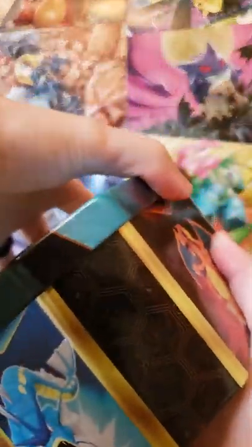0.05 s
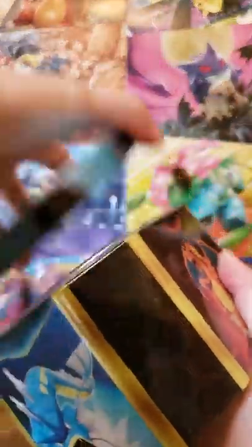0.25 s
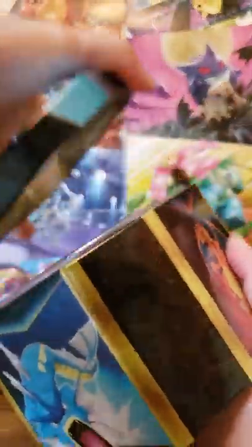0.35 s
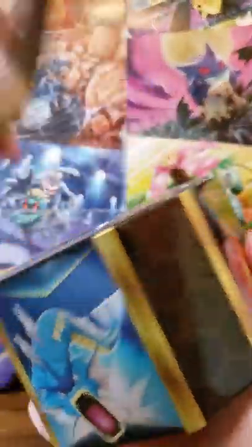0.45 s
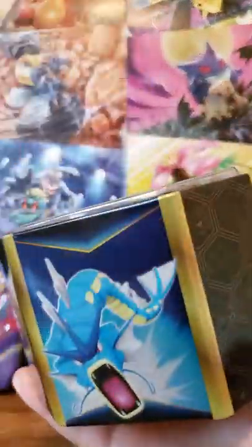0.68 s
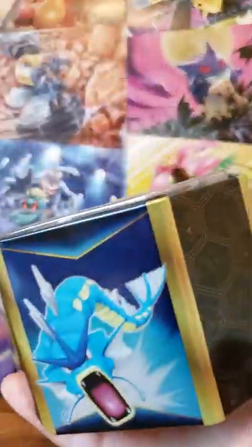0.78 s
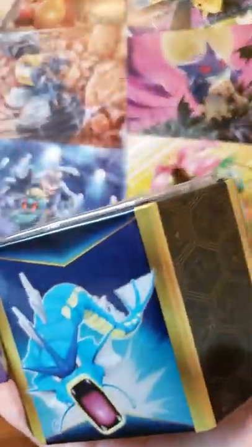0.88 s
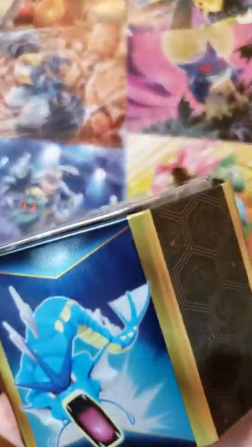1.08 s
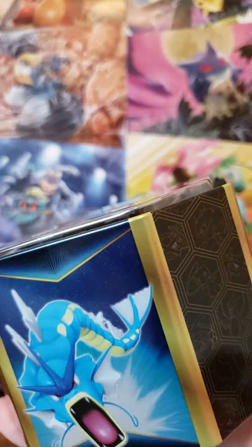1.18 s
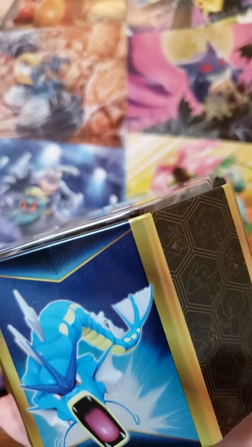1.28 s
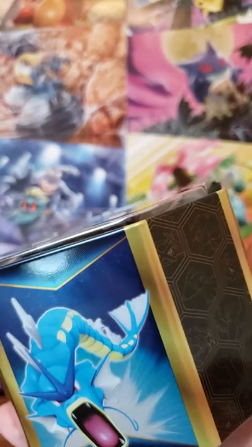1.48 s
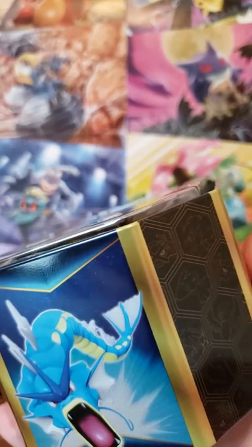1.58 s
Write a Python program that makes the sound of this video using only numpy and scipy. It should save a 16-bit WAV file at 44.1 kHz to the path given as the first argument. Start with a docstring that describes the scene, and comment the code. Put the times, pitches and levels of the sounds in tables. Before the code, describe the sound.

A tin box opens with a scrape and hollow pop, then its lid clatters down.

```python
"""Opening a tin box

A tight lid is worked off close by, in a small live room. The rim scrapes in stick-slip and snaps free,
the air inside gives a hollow pop, and the walls ring. Fingers knock and slide on the box,
the table thuds, and the lid is put down with a bright sheet-metal clatter."""
import sys
import numpy as np
from scipy import signal
from scipy.fft import rfft, irfft
from scipy.io import wavfile

SR = 44100
rng = np.random.default_rng(int(sys.argv[2]) if len(sys.argv) > 2 else 0)


def to_wav(s):
    """Save 16-bit WAV."""
    ch = np.atleast_2d(s).T  # columns
    pcm = np.round(np.clip(ch, -1, 1) * 32767)  # PCM
    wavfile.write(sys.argv[1], SR, pcm.astype(np.int16))


N = 72765
T = np.arange(N) / SR
HZ = np.maximum(np.fft.rfftfreq(N, 1 / SR), 1)
COHERENT_BELOW_HZ = 920


def amp(db):
    """Decibels to gain."""
    return 10 ** (np.asarray(db) / 20)


def curve(points, hz):
    """Interpolate (f/Hz, value) points over log frequency."""
    freqs, values = np.array(points, float).T
    return np.interp(np.log(hz), np.log(freqs), values)


def noise():
    """Two independent white noises."""
    return rng.standard_normal((2, N))


def stereo_spectra(x):
    """Two independent signals as left and right spectra, coherent in the bass."""
    mid, side = rfft(x)
    coherence = 1 / (1 + (HZ / COHERENT_BELOW_HZ) ** 4)
    return (mid * np.sqrt(1 + coherence) + np.array([side, -side]) * np.sqrt(1 - coherence)) / np.sqrt(2)


def colour(x, points, tilt_db_per_oct=0, body_db=0):
    """Shape stereo noise by a spectrum, a tilt and a body response; rms 1."""
    gain_db = curve(points, HZ) + tilt_db_per_oct * np.log2(HZ / 1000) + body_db
    shaped = irfft(stereo_spectra(x) * amp(gain_db), N)
    return shaped / shaped.std()


def decay(start, t60):
    """Sudden onset, exponential fall."""
    return (T >= start) * np.exp(-np.log(1000) * np.maximum(T - start, 0) / t60)


def ring(start, modes, rise_s=.001, corner_hz=np.inf):
    """Damped modes after one blow; soft contact weakens those above the corner."""
    out = np.zeros((2, N))
    first = int(start * SR)
    t = T[:min(N - first, SR)]
    swell = 1 - np.exp(-t / rise_s)
    for hz, db, t60 in modes:
        phase = rng.uniform(-np.pi, np.pi, (2, 1)) / (1 + (COHERENT_BELOW_HZ / hz) ** 4)
        gain = amp(db) / np.hypot(1, (hz / corner_hz) ** 2)
        envelope = gain * swell * np.exp(-np.log(1000) * t / t60)
        out[:, first:first + len(t)] += envelope * np.sin(2 * np.pi * hz * t + phase)
    return out


def sheet_metal_db(peaks, ripple_db=2.2, spacing_hz=90):
    """Thin sheet response: a few strong resonances among many irregular weak ones."""
    grid = np.arange(0, SR / 2, spacing_hz)
    ripple = ripple_db * np.interp(HZ, grid, rng.standard_normal(len(grid)))
    resonances = sum(db / (1 + (2 * (HZ - hz) / width) ** 2) for hz, width, db in peaks)
    return ripple * HZ / (HZ + COHERENT_BELOW_HZ) + resonances


def friction(strokes, spectrum, hiss_ratio=3, body_db=0, catches_per_s=900, spread_db=5):
    """Stick-slip catches over smooth hiss, swelling and dying with each stroke."""
    caught = rng.random(N) < catches_per_s / SR
    catches = caught * amp(spread_db * rng.standard_normal(N)) * noise()
    effort = sum(amp(db) * np.exp(-np.maximum((at - T) / rise, (T - at) / fall))
                 for at, rise, fall, db in strokes)
    return effort * colour(catches / catches.std() + hiss_ratio * noise(), spectrum, body_db=body_db)


# noise floor: f/Hz, level/dB
FLOOR_SPECTRUM = [(30, -1), (150, 3), (500, -9), (1200, -16), (2700, -13.5), (4000, -12.5), (7000, -3.5),
                  (9000, -22), (13000, -7), (16000, -12.5)]

def noise_floor(level_db=-73):
    """Faint steady rumble and hiss."""
    return amp(level_db) * colour(noise(), FLOOR_SPECTRUM)


# reverberation: f/Hz, t60/s
ROOM_DECAY = [(60, 0.19), (200, 0.46), (600, 0.3), (2000, 0.33), (6000, 0.4), (14000, 0.21)]

def room_tail(gap_s=.004, build_s=.0027):
    """Diffuse reflections, each octave dying at its own rate."""
    spectra, tail = stereo_spectra(noise()), 0
    centres = 62.5 * 2. ** np.arange(9)
    for hz, share in zip(centres, np.eye(len(centres))):
        band = irfft(spectra * np.interp(np.log(HZ), np.log(centres), share), N)
        tail += band * decay(gap_s, curve(ROOM_DECAY, hz))
    tail *= 1 - np.exp(-T / build_s)
    return tail / np.sqrt(np.sum(tail ** 2) / 2)


# strokes: peak t/s, rise/s, fall/s, level/dB
FINGER_STROKES = [(.49, .03, 0.027, -63), (.55, 0.024, 0.029, -53.5), (.883, 0.0045, 0.095, -59),
                  (.962, .006, 0.33, -70.5), (1.168, 0.0076, 0.1, -60.5), (1.255, 0.015, 0.12, -84)]
PALM_STROKES = [(.37, 0.065, 0.083, -50), (.545, .03, 0.042, -49.5), (.68, 0.027, 0.017, -68),
                (.965, 0.019, 0.036, -58), (1.178, 0.0095, 0.047, -53), (1.275, 0.0214, .02, -52),
                (1.42, 0.09, 0.035, -67.5), (1.635, 0.09, 0.073, -60)]
# friction spectra: f/Hz, level/dB
FINGER_SPECTRUM = [(200, 1), (900, -6), (3050, -8), (3400, 4), (7200, 2), (8600, -9.5), (12500, -1.5),
                   (16000, -3.5)]
PALM_SPECTRUM = [(40, -21.5), (150, 7), (550, -2), (1200, -10.5), (2000, -17.5), (3500, -28), (16000, -32)]

def skin_friction():
    """Fingers hiss over the printed metal; the gripping palm rubs lower."""
    return friction(FINGER_STROKES, FINGER_SPECTRUM) + friction(PALM_STROKES, PALM_SPECTRUM)


# blows: t/s, level/dB
TABLE_BLOWS = [(1.149, -49.5), (1.165, -36.5), (1.198, -44.5), (1.249, -36.5), (1.281, -47)]
# table modes: f/Hz, level/dB, t60/s
TABLE_RING = [(59.3, 0, 0.13), (113.3, -9, 0.21), (144, -11.5, 0.17)]

def table_thuds():
    """Dull blows excite the table's low modes."""
    return sum(amp(db) * ring(at, TABLE_RING, rise_s=.0014) for at, db in TABLE_BLOWS)


# knocks: t/s, level/dB, corner f/Hz, rise/s
FINGER_KNOCKS = [(0.439, -19.5, 848, 0.0116), (.494, -51, 880, 0.0015), (.528, -41, 225, 0.01),
                 (.574, -45.5, 500, 0.0048), (.648, -51.5, 300, 0.0059), (0.816, -55.5, 140, 0.0035),
                 (0.937, -52, 260, 0.0071), (1.245, -47.5, 650, 0.0013), (1.3023, -42.5, 1240, 0.00113),
                 (1.5082, -49, 900, 0.00077), (1.527, -45.5, 510, 0.0048), (1.602, -55, 650, 0.00049)]
# held box modes: f/Hz, level/dB, t60/s
HELD_BOX_MODES = [(150, -4, .08), (193, -7, .1), (287, -12, .06), (409, 1, .075), (442, -2, .07),
                  (520, -6, .04), (604, -5, .16), (615, 2, .06), (745, -4, .05), (900, -15, .04),
                  (1280, -14, .04)]
# contact noise: f/Hz, level/dB
TAP_SPECTRUM = [(60, -24), (250, -1.5), (600, 2), (1200, -2.5), (2500, -12), (8000, -1)]

def finger_knocks(tap_db=-10, tap_t60_s=.07):
    """Fingers bump the held box: modes plus contact noise, the softer the duller."""
    out = 0
    for at, db, corner_hz, rise_s in FINGER_KNOCKS:
        lowpass_db = -20 * np.log10(np.hypot(1, (HZ / corner_hz) ** 2))
        tap = decay(at, tap_t60_s) * colour(noise(), TAP_SPECTRUM, body_db=lowpass_db)
        out += amp(db) * (ring(at, HELD_BOX_MODES, rise_s, corner_hz) + amp(tap_db) * tap)
    return out


# impacts: t/s, level/dB, t60/s
LID_IMPACTS = [(1.3242, -27.5, 0.17), (1.333, -23.5, 0.12), (1.347, -29, 0.3), (1.367, -36, 0.16)]
# crash spectrum: f/Hz, level/dB
LID_SPECTRUM = [(60, -5.5), (250, -9), (350, 0.5), (600, 1), (1100, -2), (1800, -1.5), (2800, -2),
                (4000, -0.5), (6000, 0), (7900, -4.5), (8300, -14.5), (10000, -9.5), (12500, -8.5),
                (16000, -14)]
# crash resonances: f/Hz, width/Hz, boost/dB
LID_PEAKS = [(970, 96, 6.2), (1330, 54, 1.7), (1726, 56, 8.4), (2085, 110, 5.6), (2560, 87, 2.3),
             (3410, 110, 3.4), (3790, 510, 4.7), (4800, 150, 2.9), (5710, 91, 3.7), (7200, 360, 4.8)]
# lid modes: f/Hz, level/dB, t60/s
LID_RING = [(343, 0, .2), (1765, -2, .27), (2485, -8, .32), (3390, -8, .3), (3711, -6, .27),
            (3835, -4, .29), (4560, -6, .2), (4752, -4, .24), (5849, -1, .25), (6885, -9, .24)]

def lid_clatter(ring_db=-32, left_minus_right_db=-2):
    """The lid lands and rocks: a crash of dense modes, a few of which ring on."""
    body = sheet_metal_db(LID_PEAKS)
    crash = sum(amp(db) * decay(at, t60) * colour(noise(), LID_SPECTRUM, body_db=body)
                for at, db, t60 in LID_IMPACTS)
    ringing = amp(ring_db) * ring(LID_IMPACTS[0][0], LID_RING)
    return (crash + ringing) * amp(left_minus_right_db * np.array([[.5], [-.5]]))


# strokes: peak t/s, rise/s, fall/s, level/dB
RIM_STROKES = [(.006, 0.019, 0.012, -51), (.03, 0.0012, .008, -41), (.046, 0.0099, 0.013, -31.5),
               (.1, 0.015, .04, -56.5), (.193, 0.0098, 0.014, -42.5), (.22, 0.0081, .003, -27.5)]
# scrape spectrum: f/Hz, level/dB
SCRAPE_SPECTRUM = [(40, -23.5), (130, 3.5), (550, -3), (1000, -8.5), (2500, -18.5), (6000, -20),
                   (9000, -33.5), (13000, -24.5), (16000, -31)]
# metal resonances: f/Hz, width/Hz, boost/dB
SCRAPE_RESONANCES = [(266, 40, -0.5), (360, 86, 3), (468, 60, 5), (546, 130, 3.5), (980, 49, 7.5),
                     (1297, 90, 3), (1760, 140, 7), (2230, 170, 7)]

def rim_scrape():
    """The tight rim sticks and slips on the box."""
    body = sheet_metal_db(SCRAPE_RESONANCES)
    return friction(RIM_STROKES, SCRAPE_SPECTRUM, hiss_ratio=.88, body_db=body)


# clicks: t/s, level/dB, t60/s, tilt/(dB/octave)
TIN_CLICKS = [(0.2227, -13.5, 0.0077, 6.5), (0.2237, -14.5, 0.13, -0.92), (0.2419, -19.5, 0.029, 2),
              (0.264, -26, 0.097, 1.5), (0.389, -47, .012, 9), (.439, -46, 0.11, 0.5),
              (.462, -45, 0.18, 1.5)]
# click spectrum: f/Hz, level/dB
CLICK_SPECTRUM = [(35, -19), (120, 0), (300, 3), (700, -0.5), (1100, -6.5), (1800, -9), (2800, -9),
                  (5500, -11), (7300, -15.5), (9000, -25), (12500, -16), (16000, -23.5)]
# metal resonances: f/Hz, width/Hz, boost/dB
CLICK_RESONANCES = [(680, 60, 3), (990, 64, 2.6), (1230, 40, 12), (1750, 47, 4.2), (1960, 660, 5.4),
                    (5300, 1100, 1.7), (12740, 540, 2)]

def tin_clicks():
    """Sharp clicks on the tin: the rim snaps free, then light ticks as the box is knocked."""
    body = sheet_metal_db(CLICK_RESONANCES)
    return sum(amp(db) * decay(at, t60) * colour(noise(), CLICK_SPECTRUM, tilt, body)
               for at, db, t60, tilt in TIN_CLICKS)


# freed box modes: f/Hz, level/dB, t60/s
WALL_MODES = [(138, 1, .16), (170, -3, .14), (269, -1, .25), (288, -7, .25), (455, -4, .23), (536, -2, .22),
              (604, -7, .28), (679, -3, .14), (783, -2, .14), (909, -9, .17), (1363, -10, .17),
              (1611, -8, .15), (1698, -9, .15), (1858, -9, .2)]

def wall_ring(level_db=-20.5):
    """The walls ring as the lid lets go at the second click."""
    return amp(level_db) * ring(TIN_CLICKS[1][0], WALL_MODES)


def air_pop(at_s=.2205, hz=157, level_db=-.5, t60_s=.027):
    """Suction breaks: the air in the box swings for a few cycles."""
    return -ring(at_s, [(hz, level_db, t60_s)], rise_s=.0026)


# box balance: f/Hz, left minus right/dB
BOX_BALANCE = [(100, 2), (300, 1.5), (650, -4.5), (1200, -5.5), (2800, -1.5), (5500, -5), (9000, 2),
               (15000, -4.5)]

def place_box(x, left_lag_s=.00008):
    """The box sits a little to the right: the left lags, the balance varies with frequency."""
    balance_db = curve(BOX_BALANCE, HZ)
    lag = np.exp(-2j * np.pi * HZ * np.array([[left_lag_s], [0]]))
    return irfft(rfft(x) * lag * amp(np.array([balance_db, -balance_db]) / 2), N)


def scene():
    """The box close by and the lid farther off share one room."""
    tail = room_tail()

    def in_room(x, wet_db):
        return x + amp(wet_db) * signal.fftconvolve(x, tail, axes=1)[:, :N]

    box = in_room(skin_friction() + rim_scrape() + tin_clicks(), wet_db=-7.5)
    box += in_room(table_thuds() + finger_knocks(), wet_db=-12)
    box += wall_ring() + in_room(air_pop(), wet_db=-14.5)
    return noise_floor() + in_room(lid_clatter(), wet_db=-6.5) + place_box(box)


def record(dry, low_hz=35, top_hz=16000):
    """Cut the deep bass and the extreme treble."""
    highpass = signal.butter(2, low_hz, "highpass", fs=SR, output="sos")
    lowpass = signal.ellip(10, .2, 70, top_hz, fs=SR, output="sos")
    return signal.sosfilt(lowpass, signal.sosfilt(highpass, dry))


dry = scene()
out = record(dry)
to_wav(out)
```